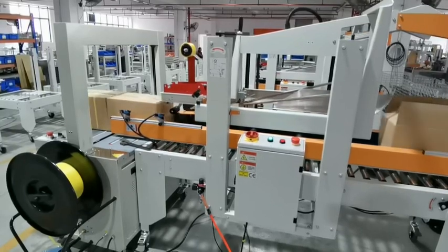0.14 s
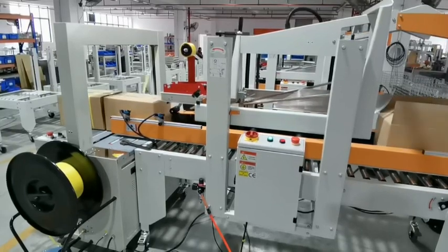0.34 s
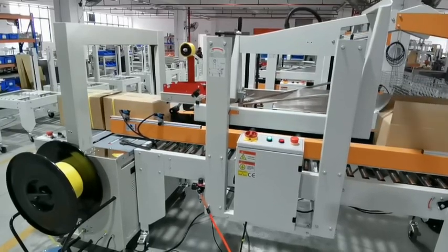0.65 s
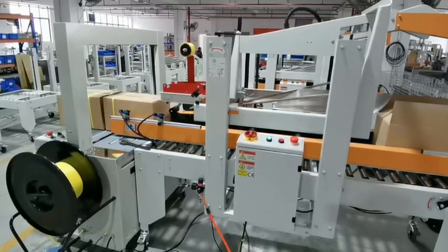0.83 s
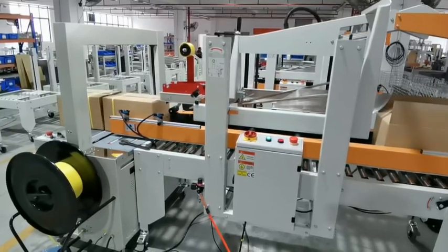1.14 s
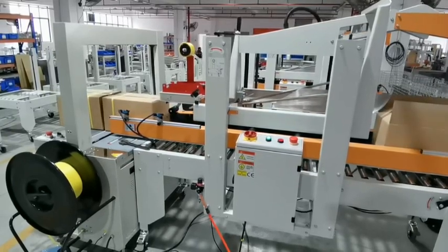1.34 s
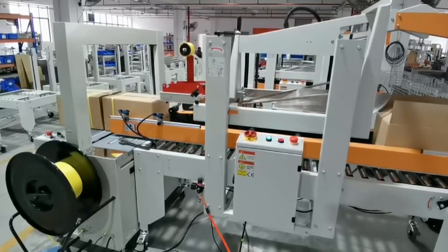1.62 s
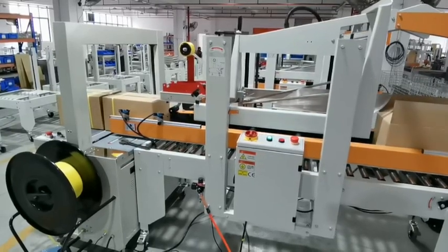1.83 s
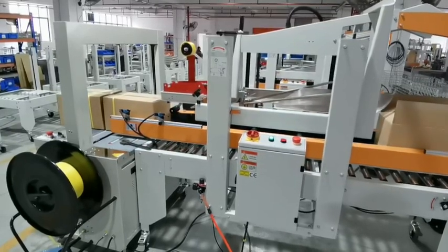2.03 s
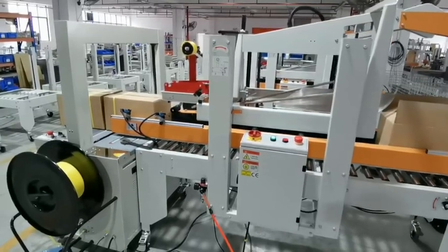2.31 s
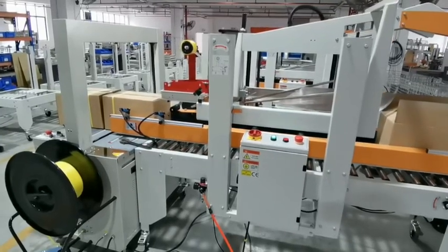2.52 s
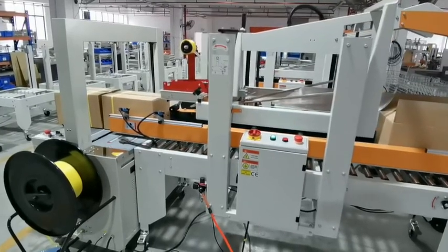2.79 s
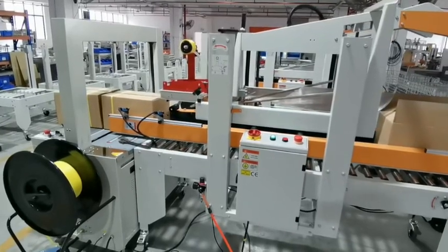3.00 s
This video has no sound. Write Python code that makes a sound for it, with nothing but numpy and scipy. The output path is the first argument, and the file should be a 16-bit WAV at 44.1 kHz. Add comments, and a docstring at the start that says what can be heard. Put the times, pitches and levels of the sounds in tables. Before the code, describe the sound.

Packaging machinery works nearby in an echoing factory hall: first a flurry of steel clacks, air bursts and cardboard thumps, then a lull of conveyor rumble, another sharp clack, a whirring strap and a low motor hum that swells and dies away.

```python
"""A factory hall, a few steps from a carton sealing and strapping line.
Air valves hiss, steel arms clack, loose parts rattle, and cartons scrape and thump along
a roller conveyor. After a hard double clack the strap whirs through its guide,
and a geared motor hums lower as it pulls the strap tight, then dies away."""
import sys
import numpy as np
from scipy import signal
from scipy.fft import rfft, irfft, next_fast_len
from scipy.io import wavfile
from scipy.ndimage import uniform_filter1d, map_coordinates

SR = 44100
rng = np.random.default_rng(int(sys.argv[2]) if len(sys.argv) > 2 else 0)


def wav_out(sig):
    """Save sig, one row per channel (or a flat mono array), as 16-bit PCM at SR to the path in sys.argv[1]."""
    wavfile.write(sys.argv[1], SR, np.round(np.clip(np.atleast_2d(sig).T, -1, 1) * 32767).astype(np.int16))


N = 138915
T = np.arange(N) / SR

# blows of the arms, and short valve ticks near 0.2, 1.64 and 2.36 s: start_s, steel_db, panel_db, snap_db
CLACKS = [(.2, -57, -60, -44), (.2763, -23, -35, -26.5), (.2905, -21.5, -22, -19), (.301, -28, -23, -17),
          (.3356, -24, -19, -23), (.353, -24.5, -31, -22), (.393, -34, -36, -21),
          (.402, -24.5, -12.5, -26), (.423, -26, -14, -20.5), (.452, -38.5, -15, -23),
          (.464, -29, -18.5, -21), (.482, -35, -37, -20), (.5262, -26, -52, -20), (.55, -24.5, -25, -27),
          (.565, -33, -34, -29), (.5896, -38, -24, -22.5), (1.112, -45, -34.5, -60),
          (1.295, -64, -30.5, -54), (1.62, -51, -48, -42), (1.6416, -40.5, -31, -39),
          (1.802, -20.5, -28.5, -27.5), (1.8152, -19.5, -36, -21), (1.882, -30.5, -21.5, -35),
          (1.915, -36, -24.5, -38), (2.3595, -33.5, -36, -25), (2.408, -46, -39, -37)]
# ringing modes of arm and panels: pitch_hz, level_db, t60_s
STEEL_MODES = [(2010, -25.5, 0.24), (2160, -5, 0.3), (2175, -2, 0.28), (2640, -1, 0.15), (2694, 2.5, 0.15),
               (3140, -20, .13), (3183, 1.5, 0.13), (3730, -3, 0.39), (4900, -11, .1), (7450, -6.5, 0.25),
               (12000, -23, .12)]
PANEL_MODES = [(636.4, -3, 0.083), (723.5, 1.5, 0.099), (806, -0.5, 0.14), (893, -9.5, 0.19),
               (1001, -16, 0.4), (1406, -10.5, 0.076)]
# tone of the crack and of the contact snap: freq_hz, level_db
CRACK_EQ = [(100, -26), (500, 5.5), (1300, -12), (1800, -7), (2500, 4.5), (3300, 5), (5000, -13),
            (8000, -13.5), (14000, -12)]
SNAP_EQ = [(300, -33), (1400, -5.5), (2200, 7), (2750, 4.5), (3300, 6.5), (4200, -18.5), (5200, 1.5),
           (7500, -8.5), (10000, -9.5), (14000, -14.5)]

def arm_clacks(crack_t60=0.098, steel_trim_db=-13, panel_trim_db=-9, snap_t60=0.013, swell_s=0.0018):
    """Each blow snaps and cracks, then rings the steel arm and sheet panels, each from its own spot."""
    out, t = np.zeros(N), T[:SR // 2]
    crack_noise, snap_noise = noise(CRACK_EQ), noise(SNAP_EQ)
    for start_s, steel_db, panel_db, snap_db in CLACKS:
        crack = snippet(crack_noise, len(t)) * amp(-60 * t / crack_t60)
        arm = amp(steel_db) * (crack + amp(steel_trim_db) * ring(STEEL_MODES, t))
        panels = amp(panel_db + panel_trim_db) * ring(PANEL_MODES, t)
        snap = snippet(snap_noise, len(t)) * amp(snap_db - 60 * t / snap_t60)
        swell = 1 - np.exp(-t / swell_s)
        add(out, start_s, hall((arm + panels) * swell + snap, wet_db=-7))
    return out


# cartons landing on the bed: start_s, level_db, pitch_hz
LANDINGS = [(0.306, -26, 177), (0.336, -31, 165), (0.405, -26.5, 123), (.428, -30, 257),
            (.46, -21.5, 271.5), (0.534, -28, 187), (.565, -26, 253), (0.593, -23, 274), (0.671, -28, 108),
            (.715, -31, 292), (.745, -30, 113), (0.769, -32, 207), (1.118, -24.5, 196.6),
            (1.728, -25.5, 214), (1.768, -24, 183), (1.83, -19, 233), (1.886, -22, 141),
            (1.986, -27.5, 168), (2.401, -38.5, 278)]
# dull, boxy tone of cardboard: freq_hz, level_db
CARDBOARD_EQ = [(25, -45), (60, -32), (105, -2), (180, -0.5), (270, 0.5), (380, -4), (520, -10), (760, -6),
                (1000, -10), (1200, -23.5), (3000, -26), (8000, -49)]

def carton_thumps(t60=0.16, attack_s=0.0067, puff_db=-8):
    """A carton lands softly: one boxy note and a dull puff."""
    out, t, puff = np.zeros(N), T[:SR // 2], noise(CARDBOARD_EQ)
    for start_s, level_db, pitch_hz in LANDINGS:
        body = np.sin(2 * np.pi * pitch_hz * t) + amp(puff_db) * snippet(puff, len(t))
        envelope = 1.27 * amp(level_db - 60 * t / t60) * (1 - np.exp(-t / attack_s))
        add(out, start_s, envelope * body)
    return hall(out, wet_db=-7)


# exhaust bursts: start_s, length_s, level_db, sag_db_per_s, rise_s, sizzle_over_hiss_db
EXHAUSTS = [(.01, 0.15, -52, 12, 0.031, -14), (0.195, 0.096, -37.5, -23, 0.007, -16),
            (0.27, 0.082, -30, 37, 0.005, -4), (0.38, 0.21, -33, 11, 0.012, -9),
            (0.943, 0.22, -60.5, 18, 0.019, -3.5), (1.607, 0.029, -46.5, 1, 0.012, -10),
            (1.638, 0.066, -40, 77, 0.0034, -15), (1.798, 0.14, -29.5, 86, 0.0015, -6.5),
            (2.352, 0.067, -37.5, 99, 0.003, -12)]
# broad hiss and its bright top: freq_hz, level_db
HISS_EQ = [(200, -3), (1400, -2), (2400, 6.5), (4500, 6), (6300, -4), (7500, 0), (10000, -7), (13500, -5)]
SIZZLE_EQ = [(3000, -35), (6000, -1), (9500, -6.5), (14000, 0)]

def air_valves():
    """Valves vent; the hiss sags as the pressure falls, and tight ports sizzle on top."""
    hiss, sizzle = noise(HISS_EQ), noise(SIZZLE_EQ)
    jets = sum(gates([burst], release_s=0.24) * (hiss + amp(sizzle_db) * sizzle)
               for *burst, sizzle_db in EXHAUSTS)
    return hall(jets * amp(0.54 * wobble(58.6)), wet_db=-10.5)


# bouts of rattling: start_s, length_s, level_db, sag_db_per_s, rise_s
RATTLE_BURSTS = [(.235, 0.035, -35.5, 0, 0.013), (.28, 0.25, -31.5, 10, .012),
                 (.522, 0.062, -32, 0, 0.0048), (1.83, 0.37, -36, 37, 0.012)]
# tone of the small contacts: freq_hz, level_db
RATTLE_EQ = [(200, -43), (900, 4.5), (1350, -8.5), (1900, 0.5), (2300, 3), (2900, -3), (4000, -9),
             (4700, -2.5), (6300, -10), (13500, -35)]

def loose_parts(bounce_hz=67.2, depth_db=5):
    """Strap and loose parts bounce unevenly, each bounce a cluster of small contacts."""
    bounce_phase = np.cumsum(bounce_hz * amp(2.5 * wobble(43))) / SR % 1
    surge = amp(depth_db * (1 - 2 * bounce_phase) + 1.2 * wobble(45))
    contacts = grains(700, RATTLE_EQ, smooth_db=-7)
    return hall(contacts * gates(RATTLE_BURSTS, release_s=0.11) * surge, wet_db=-3)


# fader ride of the strap feed: time_s, level_db
STRAP_RIDE = [(1.82, -66), (1.9, -47.5), (2.06, -43.5), (2.16, -55), (2.24, -50), (2.3, -46), (2.335, -49),
              (2.45, -69.5)]
# narrow ring of the guide: freq_hz, level_db
GUIDE_EQ = [(2000, -39), (4000, -17), (4450, 9), (4750, -10), (5600, -20), (9000, -42.5)]

def strap_feed(squeal_hz=2380, fall_hz_per_s=460, width_hz=450, waver_hz=55, guide_db=-10, hiss_db=-1):
    """The sliding strap hisses and sings in a band that sinks as it slows; its guide rings higher up."""
    start_s = STRAP_RIDE[0][0]
    pitch_hz = squeal_hz - fall_hz_per_s * np.maximum(T - start_s, 0) + waver_hz * wobble(70)
    phase = 2 * np.pi * np.cumsum(pitch_hz) / SR
    squeal = unit(wobble(width_hz) * np.sin(phase) + wobble(width_hz) * np.cos(phase))
    rub = squeal + amp(guide_db) * noise(GUIDE_EQ) + amp(hiss_db) * noise(HISS_EQ)
    return hall(rub * amp(curve(STRAP_RIDE)) * (T > start_s), wet_db=-11)


# fader ride of the motor: time_s, level_db
MOTOR_RIDE = [(1.84, -62), (1.9, -40), (2.1, -39), (2.38, -41), (2.5, -36.5), (2.64, -35.5), (2.7, -32.5),
              (2.83, -32.5), (2.87, -35), (2.89, -46), (2.96, -45), (3.0, -52), (3.15, -53)]
# rotor and gear tones: pitch_ratio, level_db
MOTOR_PARTIALS = [(1, -0.5), (1.795, -11), (2.28, -24), (2.68, -22.5)]
# low rumble of the frame: freq_hz, level_db
FRAME_EQ = [(40, -18), (85, 4), (130, 5), (230, -23), (400, -29), (1500, -62)]

def motor(rotor_hz=117.4, sag_hz_per_db=0.9, waver_hz=1.2, flutter_db=0.7, rumble_db=-14):
    """A geared motor hums louder and lower as it pulls the strap tight; its frame rumbles along."""
    level_db = curve(MOTOR_RIDE)
    strain_db = np.maximum(level_db + 36, 0)  # only the loudest stretch drags the pitch down
    pitch_hz = rotor_hz - sag_hz_per_db * strain_db + waver_hz * wobble(20)
    phase = 2 * np.pi * np.cumsum(pitch_hz) / SR
    hum = sum(amp(db + flutter_db * wobble(30)) * np.sin(ratio * phase) for ratio, db in MOTOR_PARTIALS)
    return amp(level_db) * (np.sqrt(2) * hum + amp(rumble_db) * noise(FRAME_EQ))


# fader ride of the sliding cartons: time_s, level_db
DRAG_RIDE = [(0, -47), (.19, -45), (.26, -34), (.31, -32), (.45, -31), (.6, -26.5), (.7, -40.5), (.95, -43),
             (1.52, -46), (1.63, -34.5), (1.79, -41), (1.9, -31.5), (2, -33.5), (2.1, -53.5), (2.45, -41.5),
             (2.6, -71), (3.15, -70)]

def carton_drag():
    """Cardboard drags and booms over the bed."""
    drag = grains(4000, CARDBOARD_EQ, smooth_db=3) * amp(1.8 * wobble(30))
    return hall(drag * amp(curve(DRAG_RIDE)), wet_db=-5)


# touches on the side rail: start_s, length_s, level_db, sag_db_per_s, rise_s
RAIL_TOUCHES = [(.05, 0.074, -50.5, 0, 0.028), (1.19, 0.12, -49.5, 6, 0.071)]
# papery tone of the scrape: freq_hz, level_db
SCRAPE_EQ = [(300, -23), (900, -1), (1500, 2), (2400, 10), (3200, 1), (4500, -11), (7000, -27),
             (13500, -61)]

def rail_scrapes():
    """Cardboard brushes softly along the rail."""
    brush = grains(900, SCRAPE_EQ, smooth_db=1) * amp(3.6 * wobble(35.5))
    return hall(brush * gates(RAIL_TOUCHES, release_s=0.16), wet_db=-12)


# tone of the rollers: freq_hz, level_db
ROLLER_EQ = [(25, -31), (55, -21), (100, 2.5), (200, -3), (330, -13), (480, -14), (800, -11.5), (1000, -11),
             (1250, -22), (1550, -22.5), (2300, -19.5), (3500, -23), (5300, -30.5), (6600, -45.5),
             (7500, -41.5), (10000, -74), (13500, -45)]
# fader ride of the rollers: time_s, level_db
ROLLER_RIDE = [(0, -42.5), (.9, -41.5), (1.4, -43.5), (2.4, -42), (2.85, -45), (3.15, -45)]

def conveyor():
    """Rollers tick and rumble under everything."""
    rollers = hall(grains(1200, ROLLER_EQ, smooth_db=3), wet_db=0.5)
    return rollers * amp(curve(ROLLER_RIDE) + 1.66 * wobble(14))


# background machine tones: pitch_hz, level_db
DRIVE_TONES = [(102, -54), (267, -59.5), (797, -63), (996, -65)]

def other_drives():
    """Other drives in the hall whine faintly and unsteadily."""
    whine = sum(amp(db + 4.6 * wobble(8.38)) * np.sin(2 * np.pi * hz * T + 0.44 * wobble(14))
                for hz, db in DRIVE_TONES)
    return np.sqrt(2) * whine


# reverb time of the hall: freq_hz, t60_s
HALL_DECAY = [(100, 0.87), (500, 0.84), (2500, 0.86), (7000, 0.99), (14000, 0.66)]

def hall(x, wet_db):
    """Direct sound, glances off nearby machinery and the long tail of the hall."""
    hz, t, bands = signal.stft(rng.standard_normal(SR), SR, nperseg=256)
    envelope = amp(-60 * t / along(HALL_DECAY, hz)[:, None]) * (1 - np.exp(-t / 0.003))
    tail = signal.istft(bands * envelope, SR, nperseg=256)[1]
    impulse = amp(wet_db) * tail / np.linalg.norm(tail)
    echo_samples = (rng.uniform(0.003, 0.03, 8) * SR).astype(int)
    impulse[echo_samples] += 0.13 * rng.choice([-1, 1], 8)
    impulse[0] = 1  # direct sound
    return signal.fftconvolve(x, impulse / np.linalg.norm(impulse))[:N]


def treble_flicker(x, depth_db):
    """Narrow bands flicker at random, most deeply from 3 kHz up."""
    hz, _, bands = signal.stft(x, SR, nperseg=1024)
    flicker = uniform_filter1d(rng.standard_normal(bands.shape), size=3, axis=0)
    flicker = unit(uniform_filter1d(flicker, size=7, axis=1))
    gain = amp(depth_db * np.clip(hz / 3000, 0, 1)[:, None] * np.clip(flicker, -2, 2))
    gain /= np.sqrt(np.mean(gain ** 2, axis=1, keepdims=True))
    return signal.istft(bands * gain, SR, nperseg=1024)[1][:N]


def ring(modes, t, spread=0.0133):
    """Decaying modes; weight and tuning vary with the point of contact."""
    return sum(amp(db + 2 * rng.normal() - 60 * t / t60)
               * np.sin(2 * np.pi * (hz * (1 + spread * rng.normal()) * t + rng.random()))
               for hz, db, t60 in modes)


def grains(per_s, eq, smooth_db):
    """Tiny random contacts over a smooth rub."""
    ticks = (rng.random(N) < per_s / SR) * rng.standard_normal(N)
    return coloured(unit(ticks) + amp(smooth_db) * rng.standard_normal(N), eq)


def gates(bursts, release_s):
    """Envelope of bursts that rise, sag and release; a negative sag swells."""
    envelope = np.zeros(N)
    for start_s, length_s, level_db, sag_db_per_s, rise_s in bursts:
        age = T - start_s
        held_db = level_db - sag_db_per_s * np.clip(age, 0, length_s)
        release_db = 60 * np.maximum(age - length_s, 0) / release_s
        envelope += amp(held_db - release_db) * np.clip(age / rise_s, 0, 1)
    return envelope


def amp(db):
    """Decibels to gain."""
    return 10 ** (np.asarray(db) / 20)


def unit(x):
    """Scale to rms 1."""
    return x / np.sqrt(np.mean(x ** 2) + 1e-20)


def along(points, hz):
    """Read (freq_hz, value) points on a log axis."""
    freqs, values = np.transpose(points)
    return np.interp(np.log(hz + 1), np.log(freqs + 1), values)


def curve(points):
    """(time_s, value) points as one value per sample."""
    return np.interp(T, *np.transpose(points))


def wobble(rate):
    """A smooth random curve, rate knots a second."""
    return map_coordinates(rng.standard_normal(6000), [T * rate + 2])


def filtered(x, response):
    """Apply a gain that depends on frequency."""
    size = next_fast_len(N + SR // 2)
    return irfft(rfft(x, size) * response(np.fft.rfftfreq(size, 1 / SR)), size)[:N]


def coloured(x, eq):
    """x through an EQ curve, at rms 1."""
    return unit(filtered(x, lambda hz: amp(along(eq, hz))))


def noise(eq):
    """Coloured noise of rms 1."""
    return coloured(rng.standard_normal(N), eq)


def snippet(x, samples):
    """A random stretch of x."""
    return np.roll(x, rng.integers(N))[:samples]


def add(out, start_s, x):
    """Mix x in at start_s."""
    i = max(0, round(start_s * SR))
    out[i:i + len(x)] += x[:N - i]


def scene():
    """The mono mix: bright, flickering machinery over cardboard, motor hum and the factory bed."""
    bright = treble_flicker(arm_clacks() + air_valves() + loose_parts() + strap_feed(), depth_db=4.6)
    cardboard = rail_scrapes() + carton_thumps() + carton_drag()
    return (bright + cardboard + motor() + conveyor() + other_drives())[None]


# colour of the microphone: freq_hz, gain_db
MIC_EQ = [(1000, 0.5), (7800, 2), (8200, -16), (8700, -9.5), (9800, -1.5), (10900, -8), (12000, 2),
          (14000, -2.5)]

def record(dry, top_hz=14100):
    """A small microphone with an uneven treble and a band limit."""
    return filtered(dry[0], lambda hz: amp(along(MIC_EQ, hz)) * (hz < top_hz))[None]


dry = scene()
out = record(dry)
wav_out(out)
```